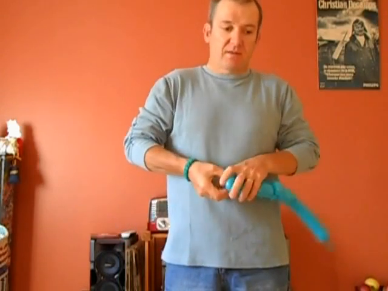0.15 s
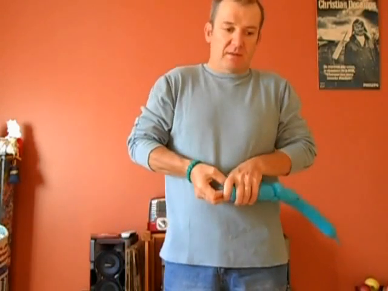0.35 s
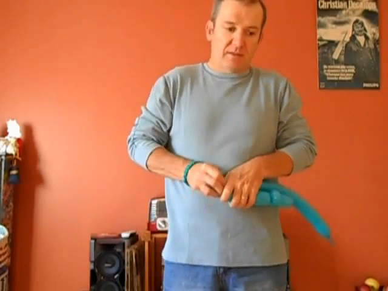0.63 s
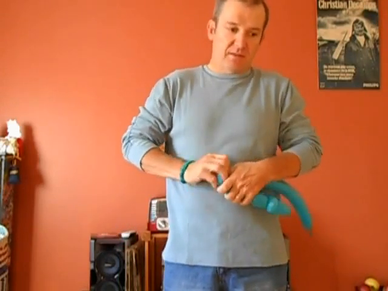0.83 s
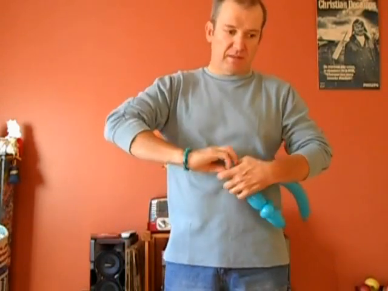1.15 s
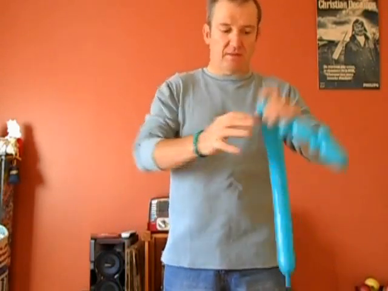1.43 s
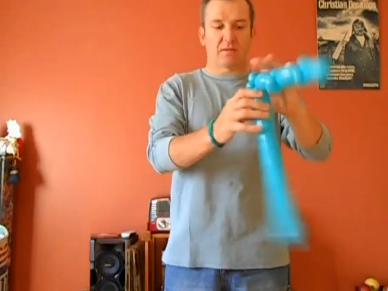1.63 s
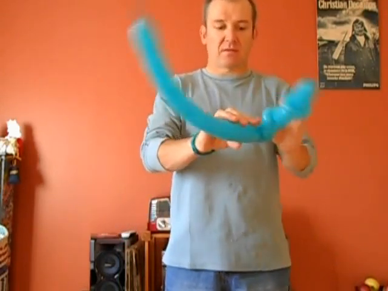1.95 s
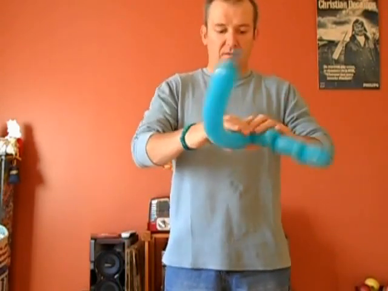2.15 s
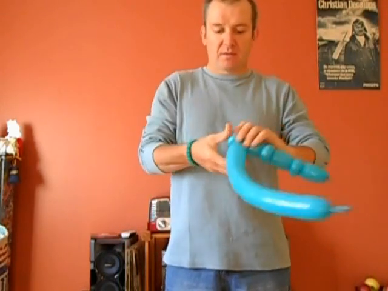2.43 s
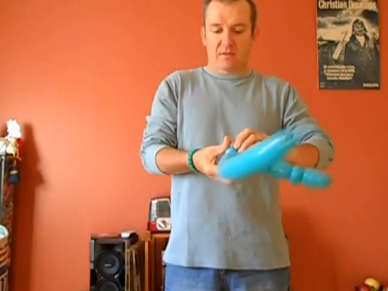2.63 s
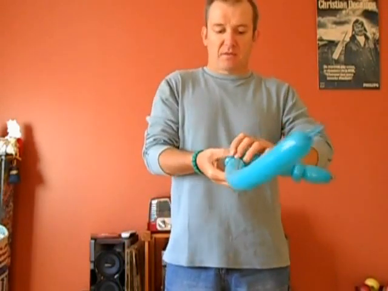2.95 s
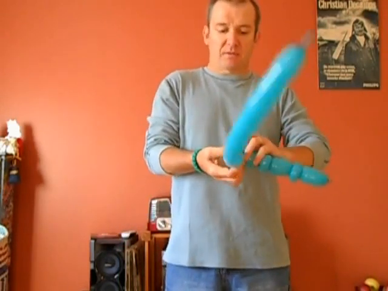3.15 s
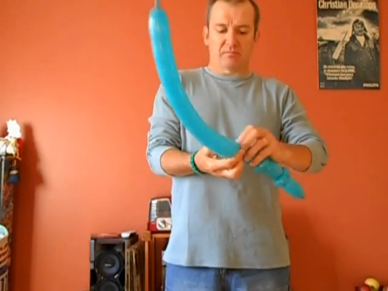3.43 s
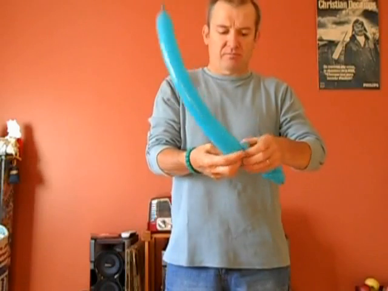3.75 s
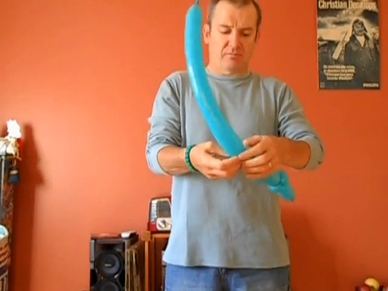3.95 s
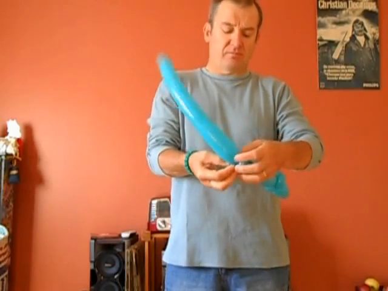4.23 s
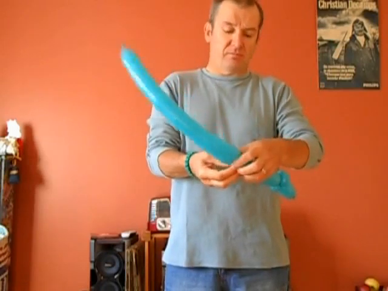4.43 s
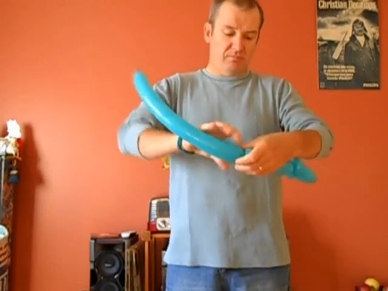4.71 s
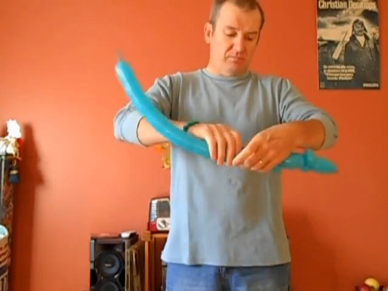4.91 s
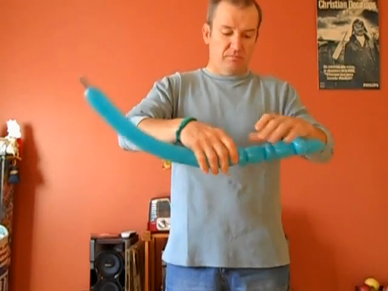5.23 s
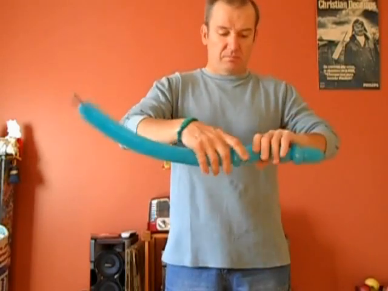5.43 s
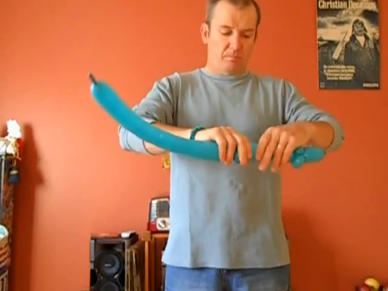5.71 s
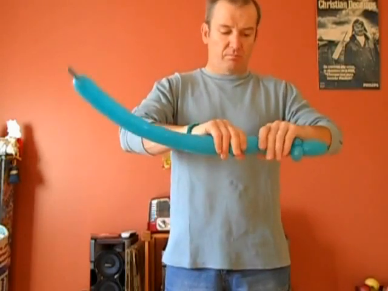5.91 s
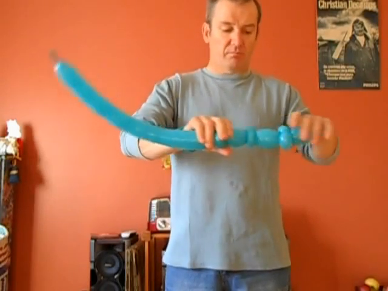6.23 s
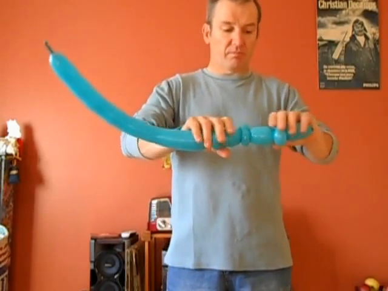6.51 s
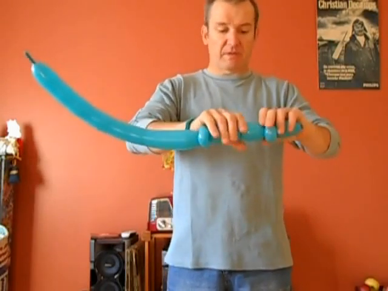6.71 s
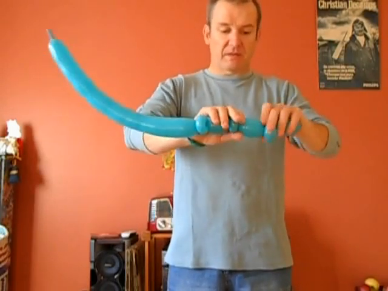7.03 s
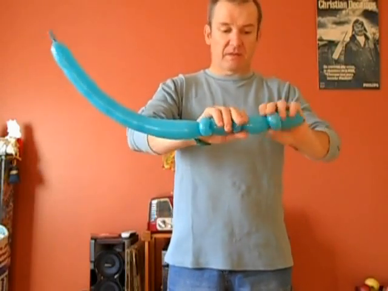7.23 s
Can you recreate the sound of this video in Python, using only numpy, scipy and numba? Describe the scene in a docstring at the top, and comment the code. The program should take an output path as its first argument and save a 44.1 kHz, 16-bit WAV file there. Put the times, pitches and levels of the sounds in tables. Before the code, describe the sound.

Hands twist a long latex balloon in a small living room, about two metres from the microphone. The rubber creaks and rustles in uneven strokes, with short squawks and sharp snaps that crowd together about a second in. The rubbing eases briefly, the free end bumps softly twice, and the twisting carries on with more squeaks and snaps to the end, over a faint hush and low rumble.

```python
"""A small living room, where hands twist and bend a long latex balloon two metres from the microphone.
Rubber sticks and slips on skin and on itself. A dense rustle of tiny slips and some loud snaps ring the
stretched rubber and the air inside, and tight twists give short squawks. The free end bumps softly twice.
The walls smear the balloon's sounds, over a faint hush and a low rumble of arms and tube."""
import sys
import numpy as np
from scipy import signal
from scipy.fft import rfft, irfft
from scipy.io import wavfile
from scipy.ndimage import uniform_filter1d
from numba import njit

SR = 44100
rng = np.random.default_rng(int(sys.argv[2]) if len(sys.argv) > 2 else 0)


def generate_wav(sig):
    """Save sig (samples, or channels by samples) to the path in sys.argv[1] as 16-bit PCM at SR."""
    pcm = np.round(np.clip(np.atleast_2d(sig).T, -1, 1) * 32767).astype(np.int16)
    wavfile.write(sys.argv[1], SR, pcm)


N = 324748

# Tone of the room's hush: f/Hz, relative level/dB
HUSH_SPECTRUM = [(30, -17), (100, -13), (150, -10), (400, 7.5), (2000, -12.5), (6000, -50), (12000, -47)]
# Low resonances of arms and tube: f/Hz, width/Hz, relative level/dB
RUMBLE_MODES = [(255.6, 72, 4.0), (151.5, 41, -2.5), (92, 93, -17.0)]
# Swings of the tube that swell the rumble: t/s, drive level/dB
TUBE_SWINGS = [(2.44, -46), (4.74, -44)]
# Hand strokes: full grip t/s, hold/s, level/dB, tube air level/dB, scratch level/dB,
# squeezed bubble f/Hz, tube air f/Hz. Air and scratch levels are relative to the bubble's ring.
HAND_STROKES = [(0.043, 0.022, -17.5, -3, -4.5, 2140, 890), (0.25, 0.013, -22, -4, -5, 2360, 970),
                (0.368, 0.096, -25.5, -3, -2, 2110, 930), (0.582, 0.075, -27, -7.5, -1, 2400, 920),
                (0.742, 0.19, -26.5, -9, 0.5, 2130, 870), (0.95, 0.089, -27, -9, -3.5, 2270, 930),
                (1.106, 0.076, -31, -17, 1, 2400, 840), (1.183, 0.011, -29.5, -4, -5, 2200, 864),
                (1.264, 0, -29, 1, -3, 2260, 680), (1.465, 0.13, -28.5, -6.5, -4.5, 2030, 800),
                (1.735, 0.011, -31.5, -7, -5, 2000, 1000), (1.84, 0.093, -36.5, -2, -10, 1790, 734),
                (2.042, 0, -38.5, -3, -11, 1820, 740), (2.287, 0.021, -25.5, -1, -3.5, 2190, 630),
                (2.406, 0.062, -27.5, -2, -1.5, 2150, 477), (2.563, 0, -24.5, -3, -2, 2140, 1020),
                (2.798, 0.13, -29.5, -6.5, -2.5, 1970, 1020), (2.887, 0.0027, -30.5, 6, -6, 2130, 880),
                (3.02, 0.056, -24.5, -4.5, 3, 1880, 1060), (3.202, 0.069, -23, -4, 1, 2340, 680),
                (3.365, 0.047, -24.5, -8, -1, 2350, 1080), (3.54, 0.031, -23.5, -2.5, -0.5, 2140, 1140),
                (3.691, 0.041, -21.5, -9, -0.5, 2080, 1070), (3.865, 0.043, -27, -5.5, 0.5, 2260, 1030),
                (4.046, 0.11, -25.5, -6.5, -1.5, 2350, 1020), (4.187, 0, -25, -7.5, 1, 2250, 850),
                (4.373, 0.067, -28.5, -5, -3.5, 2220, 950), (4.51, 0, -26, -7.5, -5, 2260, 930),
                (4.673, 0.32, -29.5, -3.5, -7, 1980, 745), (4.84, 0.049, -30.5, -8, -1, 1920, 895),
                (4.965, 0, -26, -9, 3.5, 1980, 905), (5.123, 0.007, -33.5, -2.5, -7, 2030, 770),
                (5.3, 0, -38, -2.5, -6, 1800, 820), (5.41, 0.25, -35, -4.5, -2.5, 1790, 605),
                (5.62, 0.04, -22, -1, -3, 2030, 710), (5.742, 0.081, -24.5, 0.5, -3.5, 1980, 963),
                (5.962, 0.096, -28, -1.5, -2, 2170, 900), (6.122, 0.001, -20.5, -0.5, 0, 2290, 804),
                (6.233, 0.04, -25, -3, -2, 2320, 940), (6.323, 0.0084, -27, -9, -11, 1770, 860),
                (6.602, 0.062, -28.5, -0.5, -2.5, 2150, 800), (6.733, 0.03, -21.5, -2.5, -2, 2130, 640),
                (6.926, 0.15, -21.5, -0.5, -0.5, 2080, 643), (7.059, 0.049, -21, 2.5, -3, 2240, 630),
                (7.267, 0.045, -22.5, 4, 0, 2150, 1010)]
# Resonances of the air in the tube: f/Hz, width/Hz, relative level/dB
AIR_MODES = [(456, 88, -9), (646, 780, 0), (1112, 1040, 4.5)]
# Resonances of the taut rubber, across the tube: f/Hz, width/Hz, relative level/dB
RUBBER_MODES = [(4110, 1700, 8), (5080, 1450, 1), (6470, 1400, 1.5), (7920, 1940, -3.5)]
# Squawks of a tight twist: t/s, length/s, f/Hz, level/dB
TWIST_SQUAWKS = [(0.2, 0.046, 2450, -26), (0.56, 0.045, 2650, -28), (0.928, 0.03, 5800, -33),
                 (2.171, 0.045, 2700, -37), (2.236, 0.03, 2800, -29), (2.85, 0.06, 1900, -33),
                 (2.997, .04, 1780, -26), (3.532, 0.044, 1550, -32.5), (4.72, 0.11, 1830, -33),
                 (5.605, 0.07, 1950, -24), (5.706, 0.06, 2050, -22.5), (6.555, 0.005, 2480, -31),
                 (6.91, 0.016, 2620, -27), (7.235, 0.014, 2560, -24), (7.272, 0.025, 2520, -25)]
# The loudest single slips: t/s, ring level/dB, crack level/dB relative to the ring
LOUD_SNAPS = [(0.2094, -13, -15), (0.2393, -13, -9), (0.5009, -11, -7), (0.512, -22, 3), (0.5585, -22, 5),
              (0.5983, -17, -3), (0.7895, -20, 1), (0.9205, -17, -8), (0.9435, -19, 4), (0.9573, -16, 0),
              (0.9655, -15, -3), (0.977, -15, -8), (0.9876, -13, -8), (1.0015, -15, -3), (1.0102, -17, -3),
              (1.1012, -23, 11), (1.1121, -29, 11), (1.1287, -17, -6), (1.1356, -9, -10), (1.1586, -8, -10),
              (1.1612, -16, -3), (1.181, -9, -5), (1.1944, -8, -5), (1.1978, -10, -7), (1.2011, -11, -7),
              (1.2046, -15, -5), (1.2112, -12, -7), (1.2165, -14, -7), (1.7156, -33, 8), (1.9306, -40, 9),
              (2.1724, -30, -4), (2.2197, -20, -5), (2.448, -20, 3), (2.4561, -21, 4), (2.4946, -15, -6),
              (2.5297, -15, -10), (2.5387, -13, -9), (2.619, -18, -1), (2.9493, -25, 6), (3.6508, -21, 5),
              (3.7127, -15, -10), (3.8184, -18, 2), (3.8963, -15, -8), (4.1828, -9, -3), (4.1858, -12, -8),
              (4.1948, -17, 0), (4.4834, -16, -10), (4.4905, -22, 3), (4.9784, -17, -1), (5.265, -33, 7),
              (5.541, -22, -6), (5.562, -19, -8), (6.3407, -14, -7), (6.5568, -21, 2), (6.6175, -19, 1),
              (6.679, -17, -3), (6.7947, -22, 4), (7.1407, -12, -7), (7.1758, -11, -8), (7.1793, -14, -8),
              (7.1872, -12, -9), (7.2557, -11, -3), (7.3229, -25, 10), (7.341, -25, 10)]
# Bumps of the free end: t/s, push level/dB
END_BUMPS = [(2.245, -31.5), (3.144, -19)]
# Low air resonances rung by a bump: f/Hz, relative level/dB, time to fade by 60 dB (in seconds)
BUMP_MODES = [(416, -0.5, 0.28), (557, -4, .12), (635, -2, 0.12), (333, -5, 0.11)]


def gain(db):
    """Turn decibels into a number to multiply by."""
    return 10 ** (np.asarray(db) / 20)


def at_level(x, db):
    """Scale a sound to an average (rms) level."""
    return x * gain(db) / np.sqrt(np.mean(x ** 2))


def wander(per_s):
    """Glide to a new random value, mostly between -2.5 and 2.5, per_s times a second."""
    hold = int(SR / per_s)
    steps = np.repeat(rng.standard_normal(N // hold + 1), hold)
    return 1.59 * uniform_filter1d(steps, hold)[:N]


@njit
def resonate(x, hz, width_hz):
    """A resonance: a filter that lets through the sound near a moving pitch."""
    out, band, low = np.empty(len(x)), 0., 0.
    for i in range(len(x)):
        tuning, damping = np.tan(np.pi * hz[i] / SR), width_hz / hz[i]
        swing = (band + tuning * (x[i] - low)) / (1 + tuning * (tuning + damping))
        band, low = 2 * swing - band, low + 2 * tuning * swing
        out[i] = damping * swing
    return out


def resonate_twice(x, hz, width_hz):
    """Two passes make a resonance narrower, with steeper sides."""
    return resonate(resonate(x, hz, width_hz), hz, width_hz)


def flip_signs(x):
    """Each slip lands somewhere else on the rubber, so it pushes or pulls a resonance at random."""
    return x * np.sign(rng.random(N) - .5)


def ring_modes(x, modes, flicker_db):
    """Ring several broad resonances (modes) whose strength and pitch waver as the fingers move."""
    out = np.zeros(N)
    for hz, width, db in modes:
        strength = gain(db + flicker_db * wander(18)) / np.sqrt(width)
        out += strength * resonate_twice(flip_signs(x), hz * (1 + .03 * wander(4.6)), width)
    return out


def hush():
    """Steady room air and microphone hiss."""
    hz, db = np.transpose(HUSH_SPECTRUM)
    bin_hz = np.fft.rfftfreq(N, 1 / SR) + 1
    tone = gain(np.interp(np.log(bin_hz), np.log(hz), db))
    return at_level(irfft(rfft(rng.standard_normal(N)) * tone, N), db=-51)


def rumble(rub_db, rise_s=.04, fall_s=.077):
    """Arms and tube make a dull noise that grows with the rubbing and swells at each swing."""
    t = np.arange(N) / SR
    swells = sum(gain(db) * np.exp(np.minimum((t - s) / rise_s, (s - t) / fall_s))
                 for s, db in TUBE_SWINGS)
    drive = gain(-66) + gain(rub_db - 32.5) + swells
    noise = ring_modes(rng.standard_normal(N), RUMBLE_MODES, flicker_db=2.3)
    return drive * at_level(noise, db=-5)


def strokes(rise_db_per_s=150, fall_db_per_s=61.5, brighten_db_per_s=80):
    """Hands grip fast, hold and let go slowly. Gives three level curves and two pitch curves."""
    t = np.arange(0, N + 64, 64) / SR
    grip_s, hold_s, db, tube_db, scratch_db, ring_hz, tube_hz = np.transpose(HAND_STROKES)[:, :, None]
    before = np.maximum(grip_s - t, 0)
    after = np.maximum(t - grip_s - hold_s, 0)
    power = gain(db - rise_db_per_s * before - fall_db_per_s * after) ** 2
    share = power ** 2 / np.sum(power ** 2, axis=0)  # the strongest stroke sets the tone
    scratch_db = scratch_db - brighten_db_per_s * before  # scratch comes late, as the grip closes
    curves = [10 * np.log10(np.sum(power, axis=0))]
    curves += [np.sum(share * column, axis=0) for column in (tube_db, scratch_db, ring_hz, tube_hz)]
    return [np.interp(np.arange(N) / SR, t, curve) for curve in curves]


def jerks(per_s=60, fall_s=.012):
    """The grip jerks at random moments and eases off each time."""
    kicks = (rng.random(N) < per_s / SR) * rng.random(N)
    steps = signal.lfilter([1], [1, -np.exp(-1 / (fall_s * SR))], kicks)
    return (steps - np.mean(steps)) / np.std(steps)


def slips(per_s, spread_db):
    """Rubber sticks, then lets go in tiny random clicks; most are small, a few are larger."""
    chance, push, luck = rng.random((N, 3)).T
    size = np.minimum(-np.log(1 - luck), 5)
    return (chance < per_s / SR) * (push - .5) * gain(spread_db * size)


def rustle(rub_db, tube_db, scratch_db, ring_hz, tube_hz):
    """Uneven bursts of slips ring the squeezed bubble, the air in the tube and the taut rubber."""
    grip = gain(.9 * jerks() + .69 * wander(100))
    coarse = grip * slips(per_s=6000, spread_db=1.53)
    fine = grip * slips(per_s=8000, spread_db=1.76) * gain(.69 * wander(32))
    # Each shift of the fingers nudges the creak's pitch; a broad rasp lies around it.
    creak = resonate_twice(coarse, ring_hz * (1 + .05 * wander(14)), width_hz=440.)
    high_rasp = resonate_twice(fine + .5 * coarse, 1.134 * ring_hz, width_hz=1560.)
    low_rasp = resonate_twice(coarse, .84 * ring_hz, width_hz=1090.)
    bubble = at_level(creak + 1.05 * high_rasp + 1.35 * low_rasp, db=-.51)
    squeeze = np.sqrt(grip) * slips(per_s=4000, spread_db=1.53) + .2 * coarse
    groan = resonate_twice(squeeze, tube_hz * (1 + .05 * wander(12)), width_hz=300.)
    air = at_level(ring_modes(squeeze, AIR_MODES, flicker_db=2.2) + gain(-21) * groan, db=-.4)
    scratch = at_level(ring_modes(fine, RUBBER_MODES, flicker_db=.8), db=-4)
    mix = bubble + gain(tube_db) * air + gain(scratch_db) * scratch
    mix /= np.sqrt(1 + gain(tube_db) ** 2 + gain(scratch_db) ** 2)  # the three share the energy
    bass_cut = signal.butter(4, 313, "high", fs=SR, output="sos")  # a thin tube gives little bass
    return signal.sosfilt(bass_cut, gain(rub_db) * mix)


def squawks(fall_s=.009):
    """A tight twist sets off a short run of slips that rings one narrow pitch and the taut rubber."""
    t = np.arange(N) / SR
    start_s, length_s, hz, db = np.transpose(TWIST_SQUAWKS)
    latest = np.maximum(np.searchsorted(start_s, t) - 1, 0)
    age = t - start_s[latest]
    loudness = gain(db[latest]) * (age > 0) * np.exp(-np.maximum(age - length_s[latest], 0) / fall_s)
    coarse = slips(per_s=3000, spread_db=1.5)
    treble = sum(gain(mode_db) * resonate(flip_signs(coarse), np.full(N, float(mode_hz)), float(width))
                 for mode_hz, width, mode_db in RUBBER_MODES)
    squeal = resonate_twice(coarse, hz[latest], width_hz=450.)
    return loudness * (at_level(squeal, db=0) + at_level(treble, db=-7))


def dry_ticks(treble_db, per_s=3, crack_db=5):
    """Extra rows for snaps(): dry slips at random moments, louder when the scratch is louder."""
    when, size = rng.random((int(per_s * N / SR), 2)).T
    return [(sample / SR, treble_db[int(sample)] + offset_db, crack_db)
            for sample, offset_db in zip(when * N, 6 * size - 7)]


def snaps(rows, ring_hz, rise_s=.0007, crack_s=.0006, samples=400):
    """One big slip gives a short, bright crack and a few cycles of the bubble's ring."""
    out, t = np.zeros(N + samples), np.arange(samples) / SR
    shape = (t / rise_s * np.exp(1 - t / rise_s)) ** 2
    bursts = rng.standard_normal((len(rows), samples)) * t * np.exp(-t / crack_s)
    cracks = signal.sosfilt(signal.butter(2, (3000, 6600), "band", fs=SR, output="sos"), bursts)
    for (start_s, db, crack_db), crack in zip(rows, cracks):
        i = int(start_s * SR)
        hz = ring_hz[i] * (.93 + 110 * t)  # the freed rubber tightens, so the pitch climbs
        ring = shape * np.sin(2 * np.pi * np.cumsum(hz) / SR)
        out[i:i + samples] += gain(db) * (ring + gain(crack_db) * crack / np.max(np.abs(crack)))
    return out[:N]


def bumps(rise_s=.004):
    """The free end bumps: a soft push sets the air inside ringing at low pitches."""
    t = np.arange(SR // 2) / SR
    ring = sum(gain(db - 60 * t / fade_s) * np.sin(2 * np.pi * hz * t) for hz, db, fade_s in BUMP_MODES)
    ring *= 1 - np.exp(-t / rise_s)
    pushes = np.zeros(N)
    for start_s, db in END_BUMPS:
        pushes[int(start_s * SR)] = gain(db)
    return signal.fftconvolve(pushes, ring)[:N]


def room(sound, fade_s=.3, gap_s=.003, echo_db=-10, places=24):
    """The walls add dense echoes that change as the balloon moves; their treble dies twice as fast."""
    t = np.arange(SR // 2) / SR
    noise = rng.standard_normal((places, len(t)))
    dull = signal.sosfilt(signal.butter(1, 5000, fs=SR, output="sos"), noise)
    fade = gain(-60 * t / fade_s)
    tails = (dull * fade + (noise - dull) * fade ** 2) * (t > gap_s)
    place, hop = np.linspace(0, places - 1, N), N // (places - 1)
    echoes = np.zeros(N + len(t))
    for k, tail in enumerate(tails):
        start, end = max((k - 1) * hop, 0), min((k + 1) * hop, N)
        share = np.cos(np.pi / 2 * np.clip(place[start:end] - k, -1, 1))  # blend nearby places
        tail = tail / np.sqrt(np.sum(tail ** 2))
        echoes[start:end + len(t) - 1] += signal.fftconvolve(sound[start:end] * share, tail)
    return sound + gain(echo_db) * echoes[:N]


def scene():
    """The balloon and its echoes over the rumble and hush, in one channel."""
    rub_db, tube_db, scratch_db, ring_hz, tube_hz = strokes()
    rubbing = rustle(rub_db, tube_db, scratch_db, ring_hz, tube_hz)
    snapping = snaps(LOUD_SNAPS + dry_ticks(rub_db + scratch_db), ring_hz)
    balloon = rubbing + squawks() + snapping + bumps()
    return (room(balloon) + rumble(rub_db) + hush())[None]


def record(dry, fade_hz=10070, top_hz=11900):
    """The microphone fades the highest treble, then cuts it steeply."""
    faded = signal.sosfilt(signal.butter(9, fade_hz, fs=SR, output="sos"), dry)
    return signal.sosfilt(signal.ellip(8, .2, 20, top_hz, fs=SR, output="sos"), faded)


dry = scene()
out = record(dry)
generate_wav(out)
```